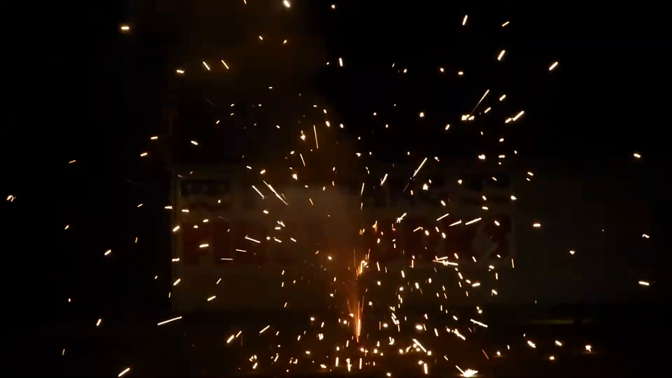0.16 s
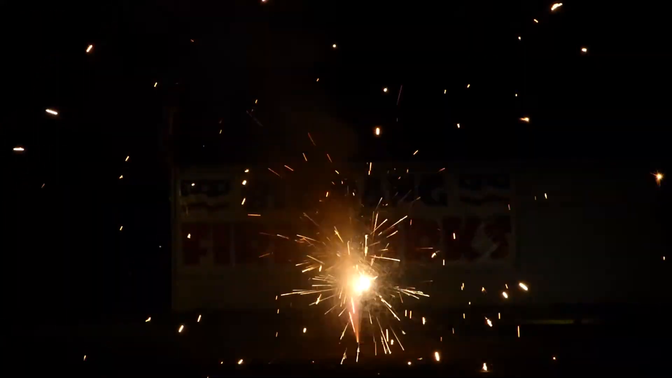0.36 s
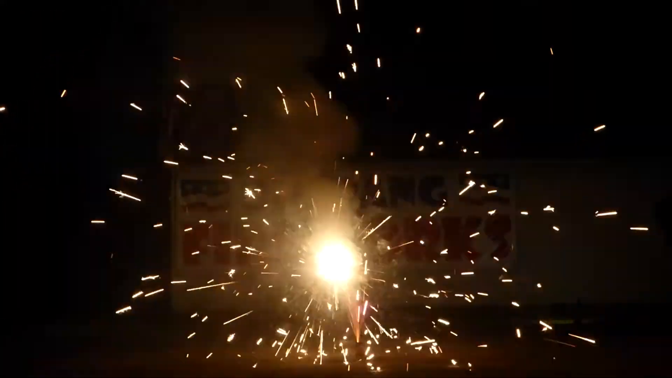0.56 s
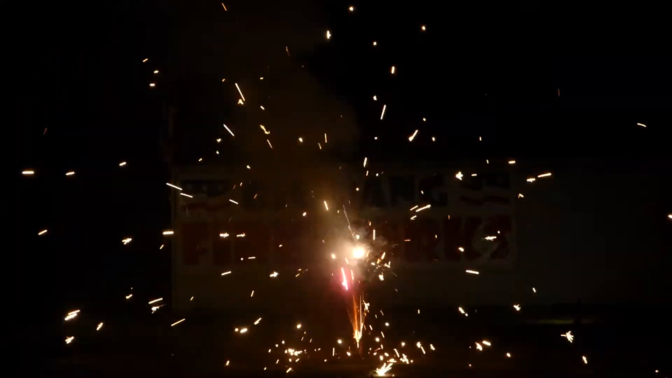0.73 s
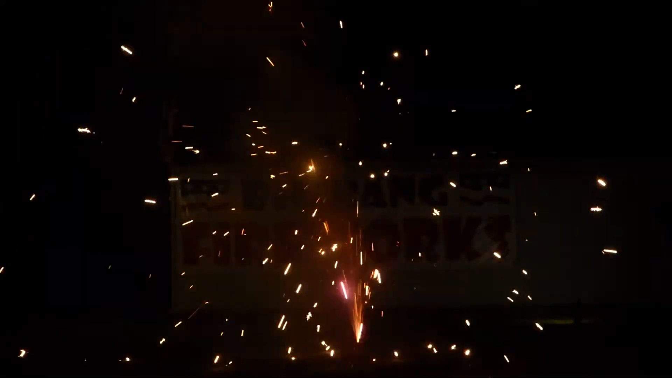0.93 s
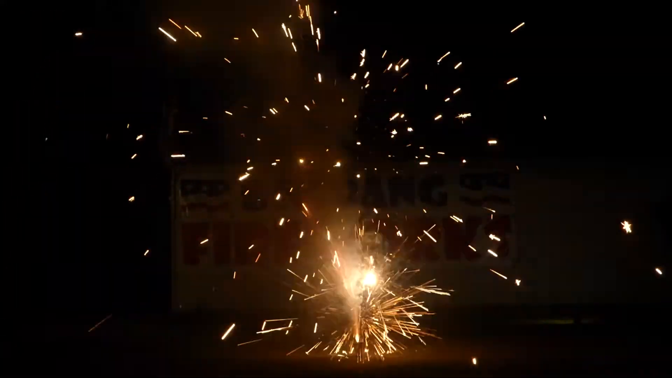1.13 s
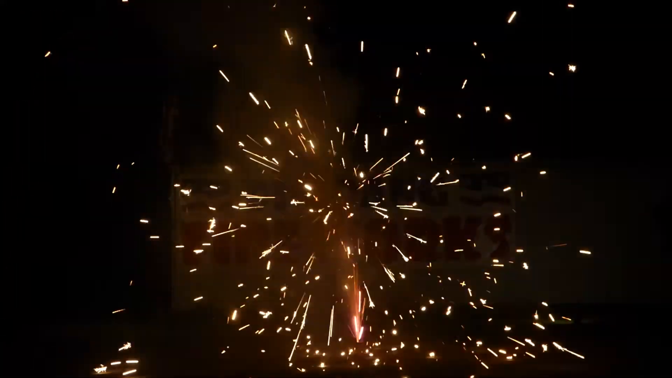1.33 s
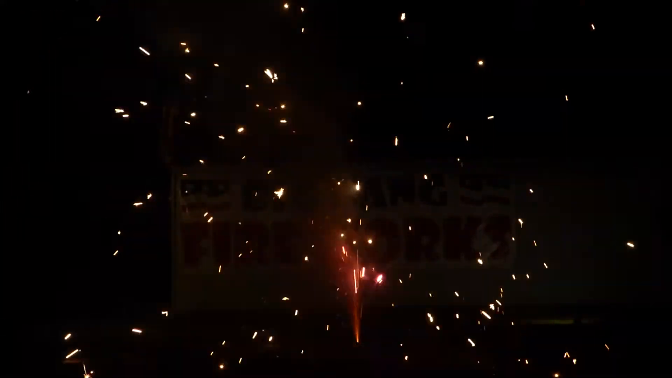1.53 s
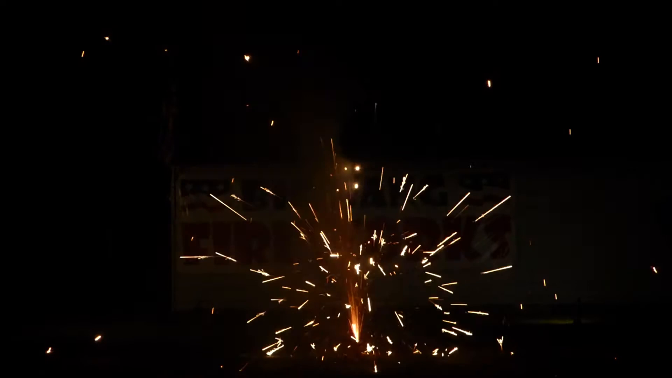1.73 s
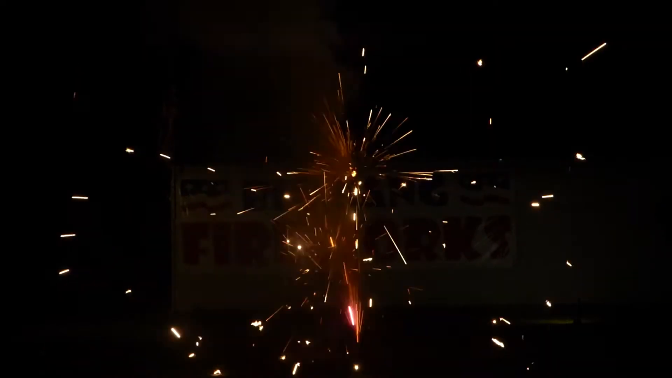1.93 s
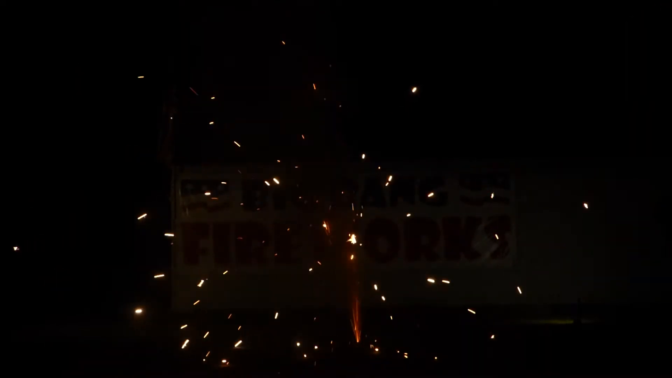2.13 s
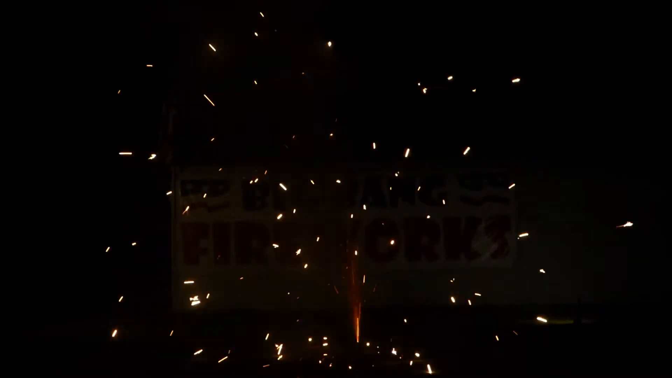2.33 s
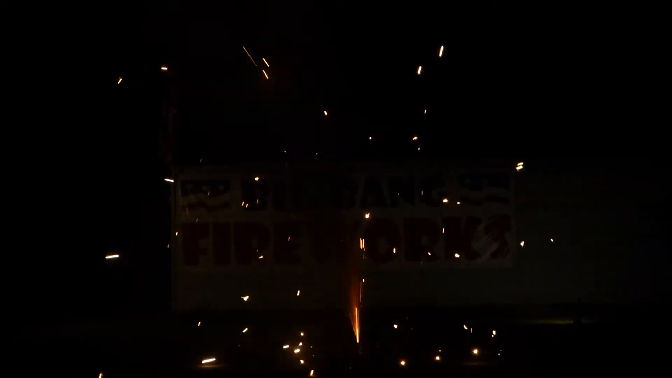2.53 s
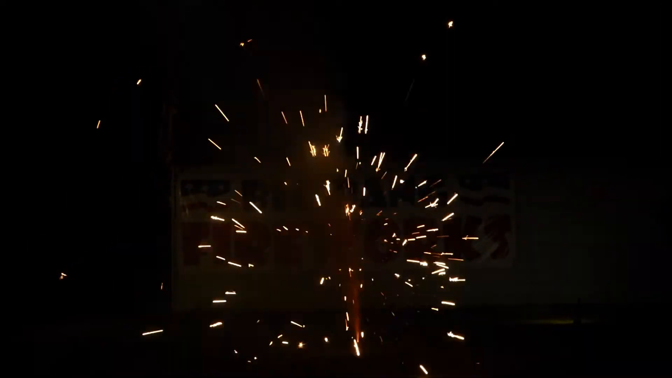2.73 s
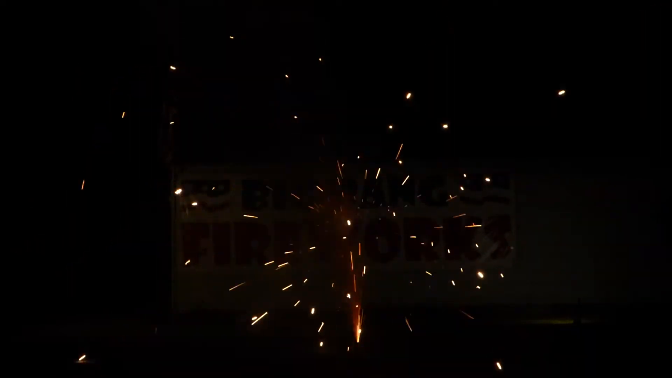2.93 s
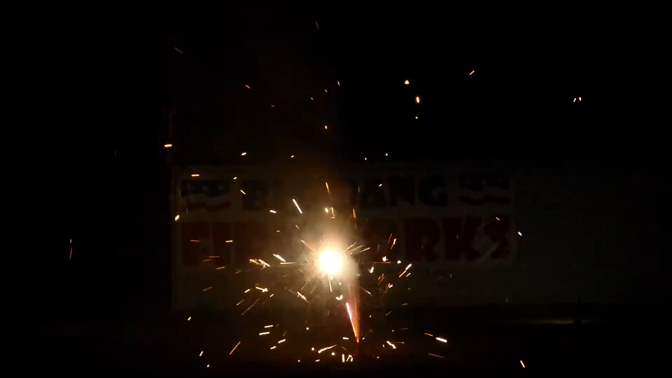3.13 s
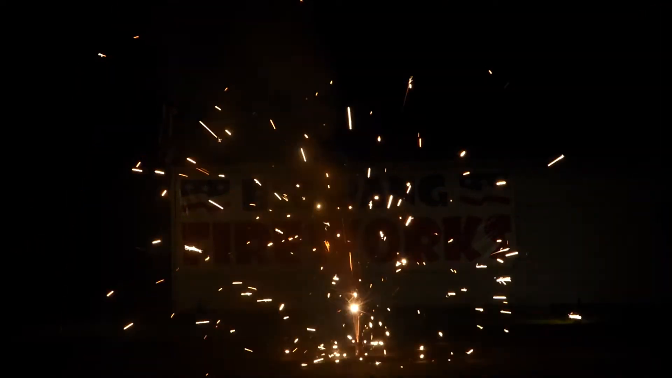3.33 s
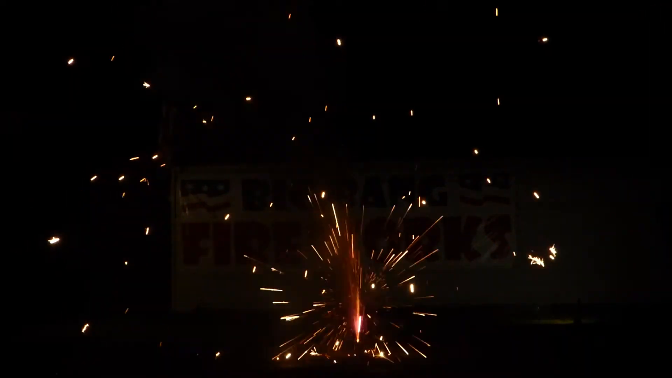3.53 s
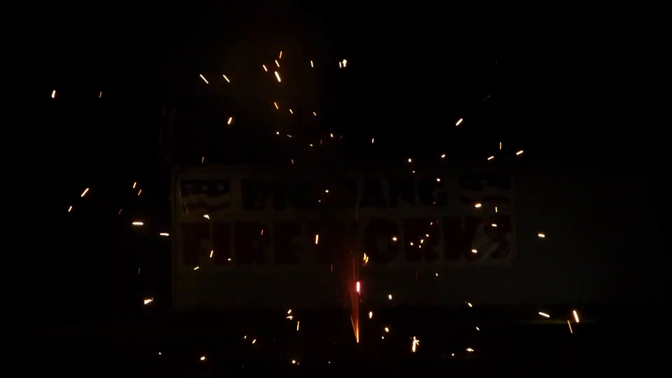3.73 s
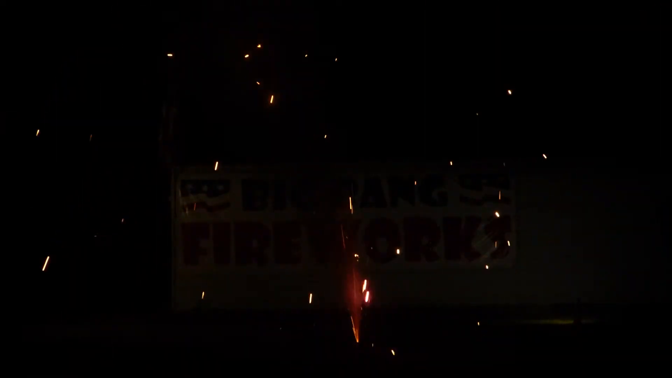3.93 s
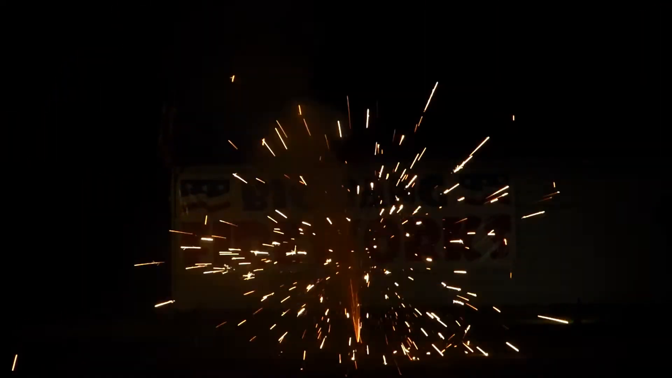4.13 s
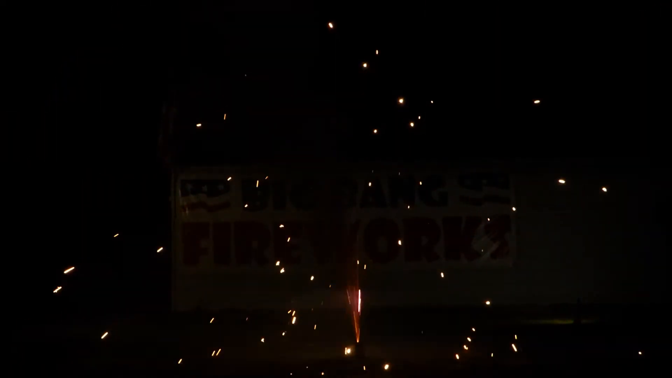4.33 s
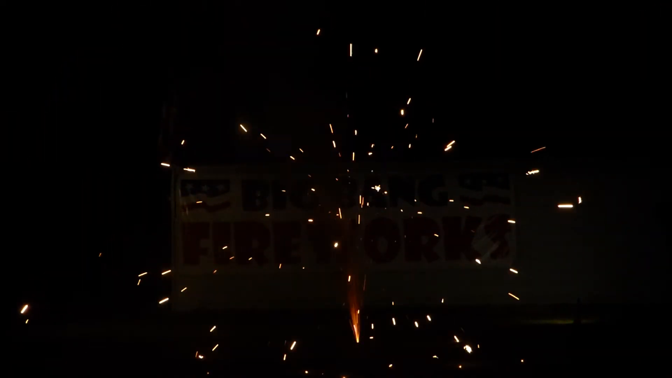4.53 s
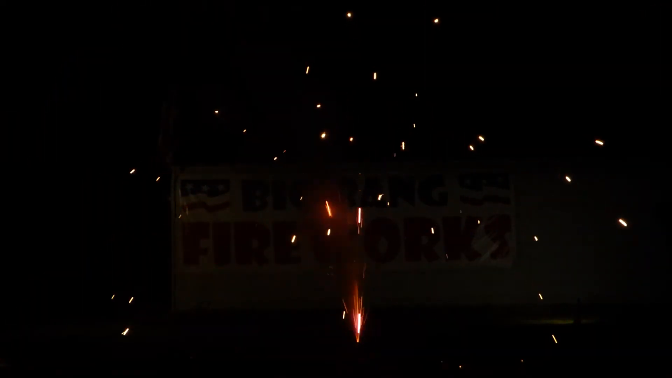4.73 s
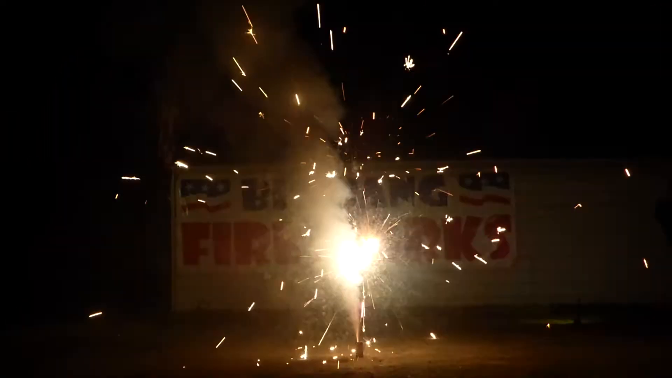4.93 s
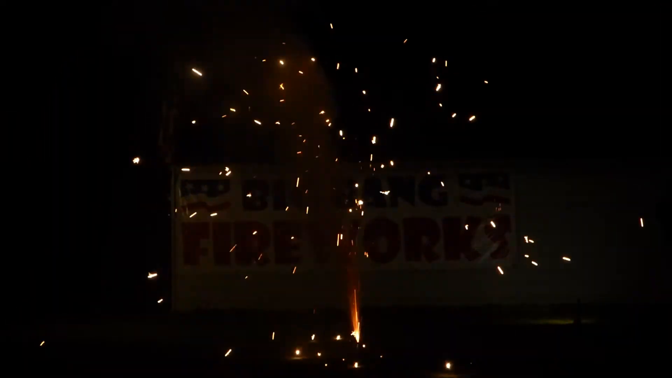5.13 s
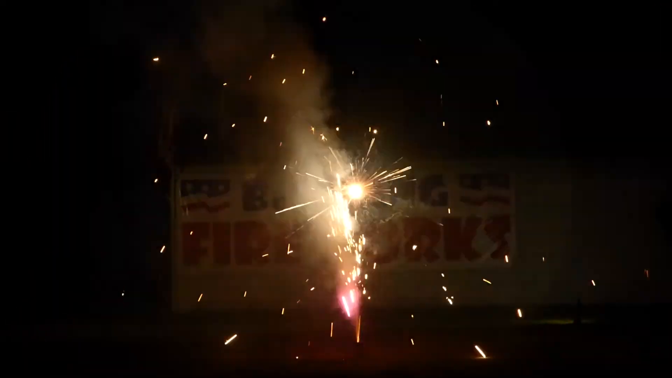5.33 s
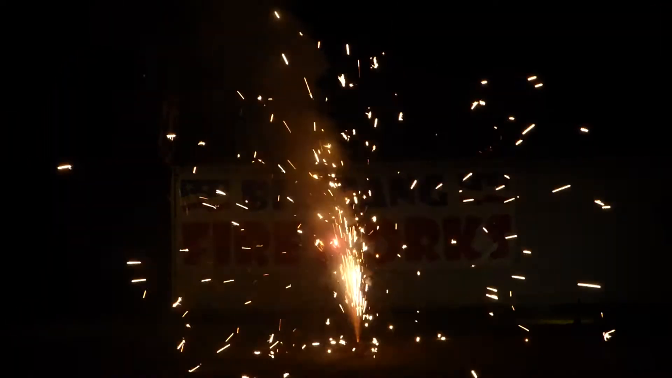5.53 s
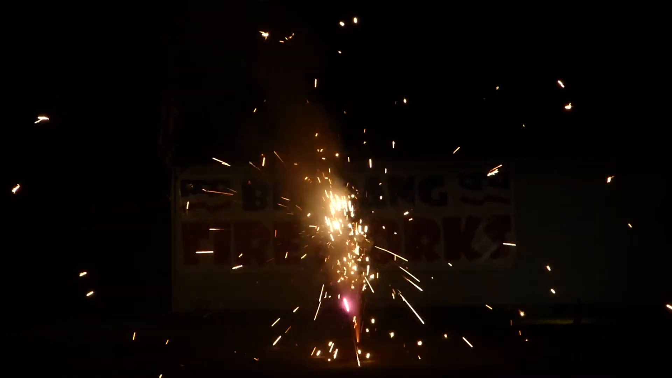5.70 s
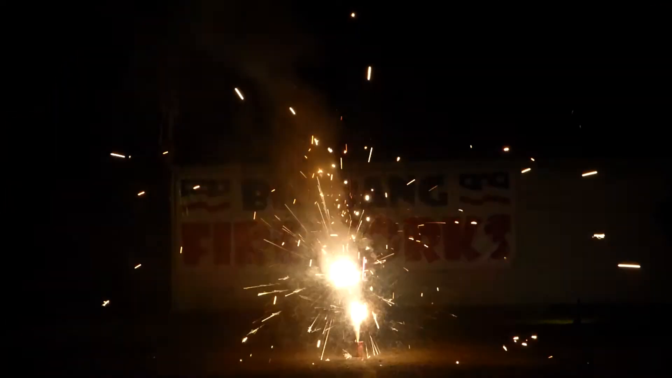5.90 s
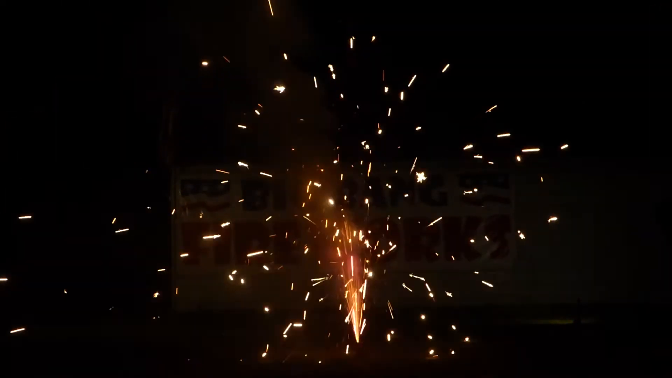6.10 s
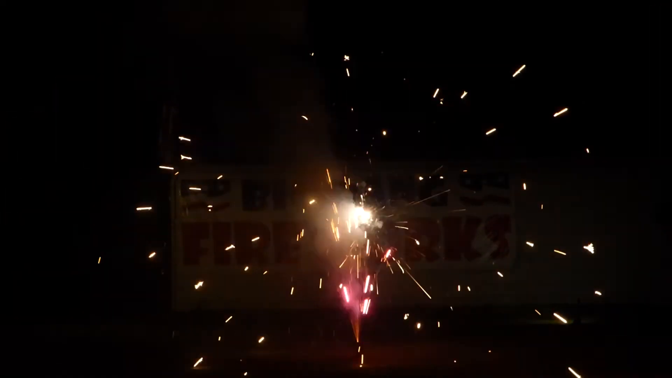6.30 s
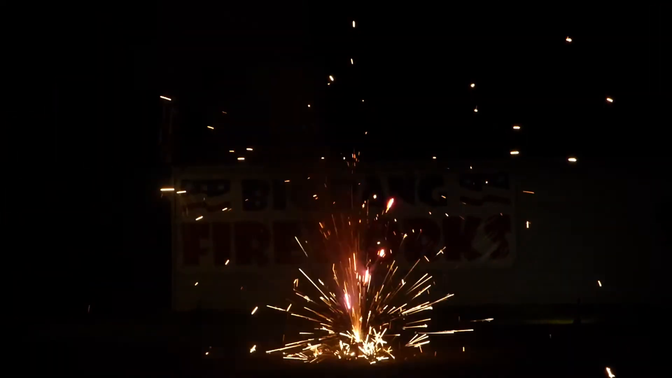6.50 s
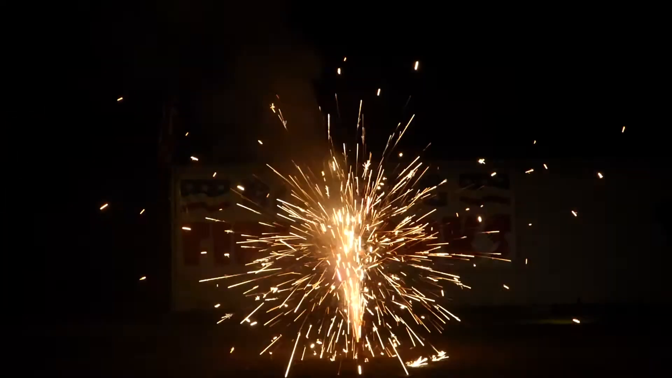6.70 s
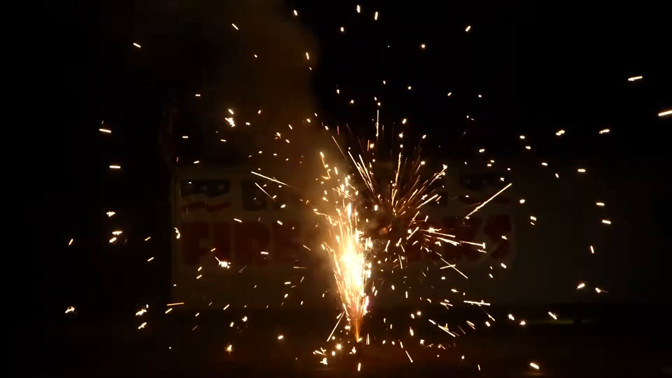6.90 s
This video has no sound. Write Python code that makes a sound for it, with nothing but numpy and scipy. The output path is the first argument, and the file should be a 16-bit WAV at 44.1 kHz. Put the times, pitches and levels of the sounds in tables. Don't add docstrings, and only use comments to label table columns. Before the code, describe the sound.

A ground firework fountain pops with sharp cracks echoing off yard walls at night, sparse in the middle, then breaking into dense loud crackle over hiss.

```python
import sys
import numpy as np
from scipy import signal
from scipy.fft import rfft, irfft, next_fast_len
from scipy.io import wavfile
from scipy.ndimage import map_coordinates

SR = 44100
rng = np.random.default_rng(int(sys.argv[2]) if len(sys.argv) > 2 else 0)


def invert_db(x):
    u = np.asarray(x, float) / 20
    return 10 ** u


def int16_out(signal):
    q = np.round(np.clip(np.atleast_2d(signal).T, -1, 1) * 32767)
    wavfile.write(sys.argv[1], SR, q.astype(np.int16))


N = 311333
SIZE = next_fast_len(N + SR // 4)
HZ = np.fft.rfftfreq(SIZE, 1 / SR)

# t/s, peak level/dB, ground bounce delay/ms, thump level/dB
OPENING = [(0.0118, -12, 0.71, 4), (.0322, -15, 0.46, 10), (0.037, -13.5, 0.3, 11.5), (.0664, -12, 0.47, 2),
           (0.0711, -11, 0.55, -4), (0.175, -11, .43, 6.5), (0.2543, -9, 1.26, 2.5),
           (.3431, -15.5, .66, -4), (0.4234, -13, .54, -1), (0.4379, -8.5, .39, 4.5),
           (0.4923, -10, 0.54, 4.5), (0.506, -8.5, 0.61, 11), (.5364, -11, 0.35, 3), (.6179, -10, 0.47, 2),
           (0.6453, -9, .51, 7.5), (0.7191, -10, .5, 6.5), (0.801, -10, 0.55, 3.5), (0.8307, -10, 0.73, 5),
           (0.8418, -10, 0.46, 3), (0.8558, -9.5, 0.93, 0.5), (1.0552, -10.5, 0.84, 2),
           (1.1049, -8.5, 1.07, 5.5), (1.1877, -15, 0.29, 8.5), (1.2068, -8.5, .43, 3.5),
           (1.258, -8, .45, 8), (1.329, -8, 0.43, 3.5), (1.3757, -8, .88, 5), (1.4383, -8.5, 0.71, 6.5)]
# t/s, peak level/dB, ground bounce delay/ms, thump level/dB, extra wall path/ms
LULL = [(1.7675, -6, .57, -12, 0.11), (1.8812, -8.5, 0.61, 10.5, -0.0013), (1.9662, -15, .5, 5, 0.044),
        (1.986, -9, .96, 8, 0.19), (2.0482, -15, 0.53, -2, -0.45), (2.2358, -6, 0.87, 6, .3),
        (2.44, -8, .49, 5, -.7), (2.7209, -9.5, 0.3, 6, -0.15), (2.7251, -8.5, 0.56, -0.5, 0.14),
        (2.9394, -9.5, 0.59, -0.5, 0.12), (3.102, -8, .57, 5, .6), (3.1798, -13, .15, -0.5, -0.049),
        (3.2068, -10.5, 0.5, 6, 0.27), (3.3055, -7, .28, 6, -0.45), (3.4187, -17, 0.337, 4, 0.37),
        (3.4366, -12.5, .3, -1, 1.55), (3.5769, -10, .29, 4, -0.72), (3.6527, -4.5, 0.42, 7.5, 0.022),
        (4.0742, -12, .45, -5, .3), (4.0919, -4.5, 0.51, -2, -0.54), (4.143, -5.5, 0.5, 8.5, -0.066),
        (4.4335, -6, .59, 1.5, -0.54)]
# t/s, peak level/dB, ground bounce delay/ms, thump level/dB
CRACKLE = [(4.8519, -4, .34, 1.5), (4.9276, -7, 0.86, 15), (5.0118, -4.5, 0.64, 6),
           (5.015, -6.5, 0.52, 7.5), (5.044, -6.5, 0.42, 4), (5.284, -6, .57, -5.5),
           (5.4078, -3.5, 0.91, 7), (5.4514, -8, 0.35, -1), (5.4525, -5, 0.48, 4),
           (5.5181, -3.5, 0.82, 6.5), (5.5194, -15, 0.38, -7), (5.5596, -16.5, .86, 8),
           (5.6266, -13.5, .91, -7), (5.641, -15, 0.65, 8), (5.6859, -6.5, 0.576, 1.5),
           (5.746, -8.5, 0.66, 6.5), (5.8307, -5, 0.54, 7.5), (5.8816, -8.5, 0.5, 4),
           (5.9231, -11, 0.62, 7.5), (5.9722, -8, 0.48, 10.5), (5.9836, -8, 0.29, 8.5)]
# t/s, peak level/dB, ground bounce delay/ms, thump level/dB
FINALE = [(6.0661, -8, 0.92, 10), (6.0789, -9, .69, 12), (6.1601, -5.5, 0.51, -4), (6.2348, -6.5, .69, 8.5),
          (6.3568, -5.5, 0.68, 3.5), (6.3952, -8.5, 0.76, -5), (6.409, -15.5, 1.26, -3),
          (6.437, -15, .63, -14), (6.4421, -14, .73, -10), (6.5606, -6, .18, 7), (6.6191, -4.5, 0.52, 2.5),
          (6.746, -6.5, 0.53, 11.5), (6.7488, -6.5, 0.28, -5), (6.7546, -8, 0.6, 3.5),
          (6.7615, -7.5, 0.71, 1), (6.8123, -9.5, 0.88, 8.5), (6.9459, -6.5, .4, 5.5),
          (6.9564, -8, 0.72, 10.5), (7, -21, 0.55, 7), (7.0157, -8, .32, 6)]
# t/s, peak level/dB, thump level/dB
FRAGMENTS = [(0.0289, -8.5, 5), (.298, -21, -14), (.3735, -18.5, -16), (0.854, -16, 3), (1.7655, -7, 7.5),
             (2.0283, -21, -9), (2.252, -11.5, 3.5), (3.121, -24, 5), (3.3804, -10, -9), (3.659, -17.5, 9),
             (4.907, -15, 7), (4.921, -4.5, 5), (5.0864, -19, -5), (5.113, -22.5, 13), (5.2063, -15.5, 8),
             (5.479, -5.5, 3), (5.6406, -3.5, -16), (5.6883, -21, -18), (5.6897, -15, -11),
             (6.0256, -21, 18), (6.0821, -21, 9), (6.108, -25, 20), (6.12, -22, 9), (6.147, -26, 19.5),
             (6.8431, -17, 0), (6.853, -14, -13), (6.8584, -14.5, 1), (6.879, -20, -8), (6.8883, -18.5, 6)]
# t/s, peak level/dB
SNAPS = [(.0081, -28), (.4326, -27), (.9778, -25), (3.3407, -24), (3.3659, -23), (3.6352, -23),
         (3.7536, -31), (4.1171, -26), (5.6732, -31), (5.7254, -25), (6.2, -25), (6.3719, -27),
         (6.414, -25), (6.4491, -22), (6.471, -25), (6.4789, -21), (6.517, -30), (6.5898, -21),
         (6.6144, -22), (6.8346, -22), (6.883, -23)]
# delay/ms, slide per unit of star place/ms
WALL_DELAYS = [(.6, 0), (2.25, 0), (4.3, 0), (9, 0), (22.1, 0), (41.8, 1.8), (63.6, 1.5), (67.8, 1),
               (101, 0), (121.7, 0), (143.6, 0), (163, 1.4), (243.4, 0), (284.7, 1.4)]
# mirror level/dB, scatter level/dB, scatter t60/s, L-R level/dB, tilt/(dB per octave)
WALL_SOUND = [(-60, -25, 0.03, -5.5, 4), (-24, -41, 0.069, 12.5, 0), (-37.5, -60, .02, 5, -6.5),
              (-25.5, -60, .02, 13, -3.5), (-19.5, -35.5, 0.046, 0.5, -4),
              (-14.5, -25.5, 0.019, -1.5, -3.2), (-25, -35.5, 0.025, 1.5, -4), (-6.5, -33, 0.045, -12, 0.5),
              (-43, -46, 0.04, -5, -12), (-28.5, -35, 0.018, -3, 2.5), (-31.5, -69, 0.02, -3, 0.5),
              (-22.5, -43, 0.029, -2.5, 1), (-27, -52, 0.035, 0, 0), (-33, -48, 0.037, -2, -6)]
WALL_TREBLE = [20000, 20000, 20000, 20000, 12000, 12300, 15000, 5300, 12000, 14000, 9000, 16000, 9000,
               10000]
# low f/Hz, high f/Hz, level/dB, t60/s
FAR_TAIL = [
    (120, 880, -39, 0.31),
    (1030, 2570, -43.5, 1.05),
    (3980, 9700, -51.5, 1.83),
    (9300, 20000, -78, 1.1),
]
# f/Hz, likeness/(0 to 1)
LIKENESS = [(100, 0.59), (250, 0.74), (600, 0.46), (3000, 0.75), (8000, 0.5), (14000, 0.057)]
# f/Hz, width/Hz, level/dB
HOUSING = [(149, 120, 8.5), (211, 94, 10.5), (334, 107, 4.5), (392.7, 55, -29), (470, 116, 11.5),
           (664, 69, 7.5), (1122, 440, 5)]
# f/Hz, width/Hz, level/dB
CAPSULE = [(2027, 970, 8.5), (3290, 320, -2.5), (4050, 68, 6.5), (4850, 105, 4), (5610, 2780, 5.5),
           (9020, 3000, 7)]
# f/Hz, width/Hz
PHASE_LAGS = [(170, 170), (1500, 2600), (3600, 1250)]
# t/s, hiss level/dB
JET_LEVEL = [(0.0, -36), (1.16, -68), (1.32, -59), (1.61, -59), (2.02, -44.5), (2.79, -69), (3.3, -45),
             (4.09, -50.5), (4.27, -42.5), (4.89, -51), (5.03, -38), (5.35, -46), (5.54, -37),
             (7.06, -47.5)]
# f/Hz, level/dB
JET_COLOUR = [(150, -42), (400, -5.5), (1000, -6.5), (1900, -3.5), (3200, -7), (5500, -3.5), (9500, -8),
              (13000, -19), (16500, -50)]


def bursts():
    s, db, bounce_ms, bounce_db, thump_db = pops()
    s = s - .00012
    pan = invert_db(np.outer([.5, -.5], -.8 + 1.3 * rng.standard_normal(len(s))))
    echo_blast = invert_db(6) * blast(HZ, .00002) + invert_db(-3.0) * blast(HZ, .0001)
    sound = yard(s, invert_db(db + .47 * thump_db), bounce_ms) * echo_blast
    crack = (9, .00002)
    thump = (thump_db - 1, .00011)
    push = (1.97 * thump_db - 23.0, .0012)
    for extra_db, tau_s in (crack, thump, push):
        size = invert_db(db + extra_db)
        near = []
        for p in pan:
            straight = spikes(s, size * p)
            bounced = spikes(s + bounce_ms / 1000, size * invert_db(bounce_db) * p ** 2)
            near.append(straight + bounced)
        sound = sound + rfft(np.array(near), SIZE) * blast(HZ, tau_s)
    return sound


def pops():
    star_bounce_db = -2
    low_bounce_ms, low_bounce_db = .287, -15.5
    snap_thump_db = 1
    airborne = LULL + OPENING + CRACKLE + FINALE
    stars = [(s, db, ms, star_bounce_db, thump) for s, db, ms, thump, *_ in airborne]
    low = FRAGMENTS + [(s, db, snap_thump_db) for s, db in SNAPS]
    small = [(s, db, low_bounce_ms, low_bounce_db, thump) for s, db, thump in low]
    return np.transpose(stars + small)


def blast(f, tau_s):
    u = 2j * np.pi * f * tau_s
    return u / (1 + u) ** 2


def yard(s, size, bounce_ms):
    octaves = np.log2((HZ + 300) / 3000)
    aim = np.outer([.5, -.5], 1 / (1 + (500 / (HZ + 1)) ** 4))
    place = .25 * rng.standard_normal(len(s))
    place[:len(LULL)] = [row[-1] for row in LULL]
    echoes, scatter_power = 0, 0
    for (ms, slide_ms), wall, top_hz in zip(WALL_DELAYS, WALL_SOUND, WALL_TREBLE):
        echo_db, scatter_db, t60, pan_db, tilt_db = wall
        luck = rng.standard_normal((len(s), 2))
        at = s + (ms + slide_ms * place + .04 * luck[:, 0]) / 1000
        loud = size * invert_db(1.2 * luck[:, 1])
        mirror = spikes(at, loud) + .7 * spikes(at + .42 * bounce_ms / 1000, loud)
        colour = invert_db(echo_db + tilt_db * octaves + pan_db * aim) / (1 + (HZ / top_hz) ** 4)
        echoes = echoes + rfft(mirror, SIZE) * colour
        side_gain = invert_db(scatter_db + .42 * pan_db * np.array([[1], [-1]]))
        scatter_power = scatter_power + (dying(at, loud, t60, .0001) * side_gain) ** 2
    scatter_colour = invert_db(-1.4 * octaves) / (1 + (400 / (HZ + 1)) ** 2)
    scatter = rfft(np.sqrt(scatter_power) * pair(), SIZE) * scatter_colour
    return echoes + scatter + far_tail(s, size)


def far_tail(s, size):
    noise = rfft(pair(), SIZE) * invert_db([[-.8], [.8]])
    tail = 0
    for low_hz, high_hz, db, t60 in FAR_TAIL:
        edges = np.sqrt((1 + (low_hz / (HZ + 1)) ** 4) * (1 + (HZ / high_hz) ** 4))
        band = irfft(noise / edges, SIZE)[:, :N]
        tail = tail + rfft(invert_db(db) * dying(s, size, t60, .026) * band, SIZE)
    return tail


def microphone(f):
    gain = invert_db(-1.0) * modes(CAPSULE + HOUSING, f)
    for hz, width_hz in PHASE_LAGS:
        stiff = hz * hz - f * f
        gain = gain * (stiff - 1j * f * width_hz) / (stiff + 1j * f * width_hz)
    return gain


def modes(table, f):
    gain = 1
    for hz, width_hz, db in table:
        stiff = hz * hz - f * f
        gain = gain * (stiff + 1j * f * width_hz * invert_db(db)) / (stiff + 1j * f * width_hz)
    return gain


def jet():
    s, db = np.transpose(JET_LEVEL)
    t = np.arange(N) / SR
    flutter_hz = 12
    flutter = map_coordinates(rng.standard_normal(int(N * flutter_hz / SR) + 4), [t * flutter_hz])
    luck = rng.random((900, 2))
    spits = spikes(luck[:, 0] * N / SR, invert_db(13 - 3.2 * np.log(luck[:, 1] + .01)))
    hiss = filtered(pair() + spits, lambda f: invert_db(along(JET_COLOUR, f)))
    return hiss / hiss.std() * invert_db(np.interp(t, s, db) - 9.0 + .47 * flutter)


def shudder():
    s, db, _, _, thump_db = pops()
    centre_hz, t60 = 80, .15
    noise = rng.standard_normal((2, N))
    low = filtered(noise, lambda f: 1 / (1 + (f / centre_hz) ** 2 + (centre_hz / (f + 1)) ** 2))
    return invert_db(-49) * dying(s, invert_db(db + .33 * thump_db), t60, .0018) * low / low.std()


def rumble():
    deep = filtered(rng.standard_normal((2, N)), lambda f: 1 / (1 + (f / 45) ** 2))
    town = filtered(pair(), lambda f: 1 / (1 + (150 / (f + 1)) ** 4) / (1 + (f / 450) ** 2))
    hush = filtered(rng.standard_normal((2, N)), lambda f: (f > 9000) * (f < 15300))
    return invert_db(-71) * hush + invert_db(-68.5) * deep / deep.std() + invert_db(-64.5) * town / town.std()


def pair():
    turn = np.arccos(np.clip(along(LIKENESS, HZ), -1, 1)) / 2
    mid_side = np.array([np.cos(turn), np.sin(turn)])
    mid, side = filtered(rng.standard_normal((2, N)), lambda f: mid_side)
    return np.array([mid + side, mid - side])


def dying(s, size, t60, rise_s):
    power = np.bincount(np.clip(s * SR, 0, N).astype(int), size ** 2, N + 1)[:N]
    feed = 1 / (1 + rise_s * SR)
    rising = signal.lfilter([feed], [1, feed - 1], power)
    return np.sqrt(signal.lfilter([1], [1, -invert_db(-120 / (t60 * SR))], rising))


def spikes(s, size):
    at = np.asarray(s) * SR
    k = np.floor(at).astype(int)[:, None] + np.arange(-8, 9)
    away = k - at[:, None]
    shape = np.sinc(away) * np.cos(np.pi * away / 18) ** 2
    ok = (k >= 0) & (k < N)
    return np.bincount(k[ok], (shape * np.asarray(size)[:, None])[ok], N)


def filtered(x, response):
    return irfft(rfft(x, SIZE) * response(HZ), SIZE)[..., :N]


def along(points, hz):
    f, v = np.transpose(points)
    return np.interp(np.log(hz + 1), np.log(f + 1), v)


def scene():
    stars = irfft(bursts() * microphone(HZ), SIZE)[:, :N]
    return stars + jet() + shudder() + rumble()


def roll_off(x):
    return signal.sosfilt(signal.butter(12, 16970, fs=SR, output="sos"), x)


def record(dry):
    x = filtered(dry, lambda f: 1 / (1 + 1.3j * f / 12000 - (f / 12000) ** 2))
    x = x / (1 + np.abs(x / 2.34) ** 4) ** (1 / 4)
    x = filtered(x, lambda f: 1 / (1 + (f / 15400) ** 24) * (f < 16900))
    return roll_off(x - .0029)


dry = scene()
out = record(dry)
int16_out(out)
```